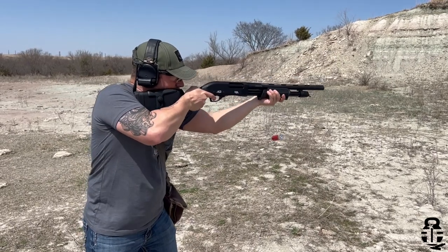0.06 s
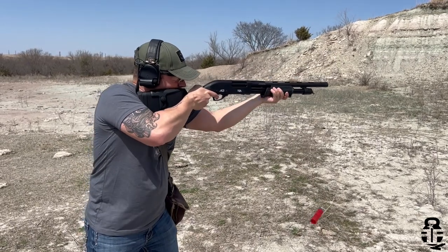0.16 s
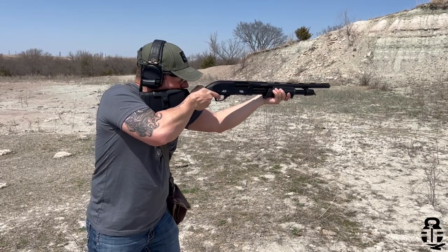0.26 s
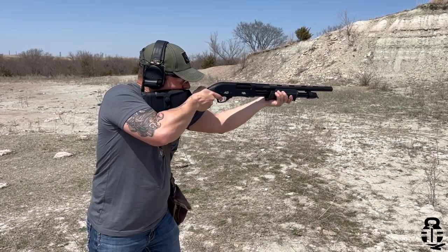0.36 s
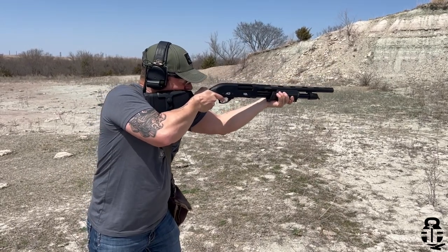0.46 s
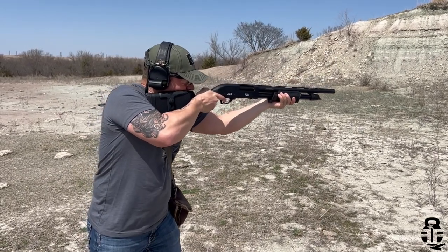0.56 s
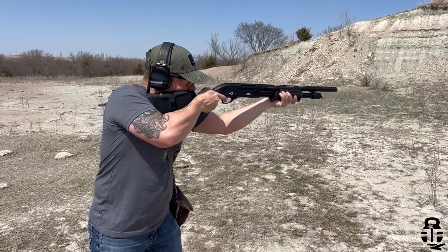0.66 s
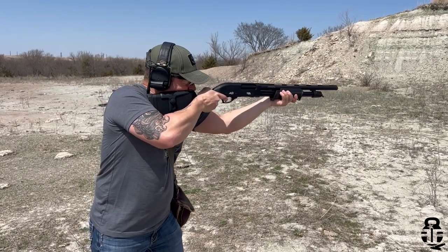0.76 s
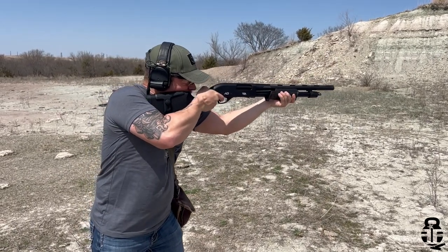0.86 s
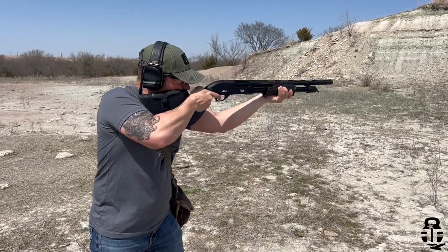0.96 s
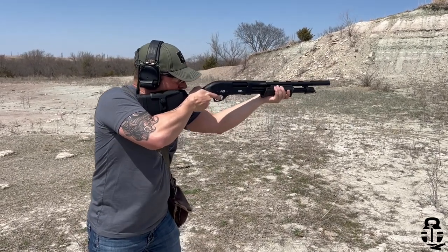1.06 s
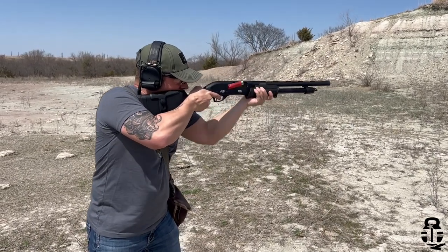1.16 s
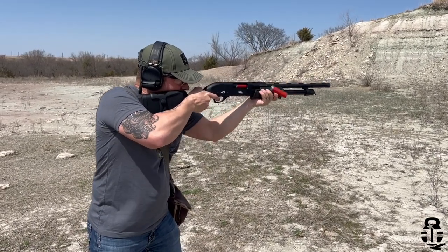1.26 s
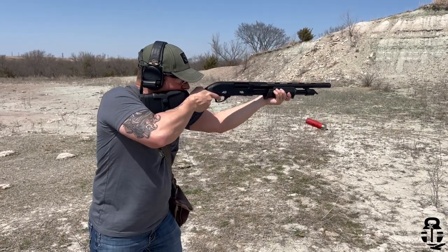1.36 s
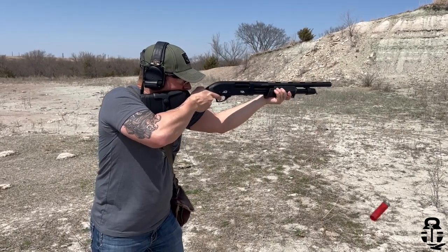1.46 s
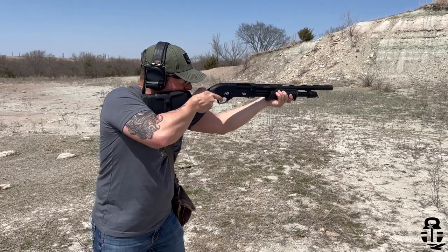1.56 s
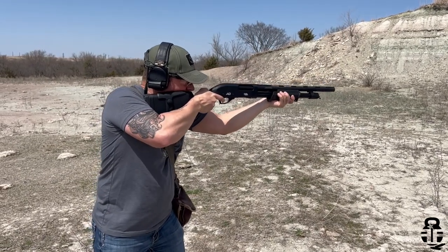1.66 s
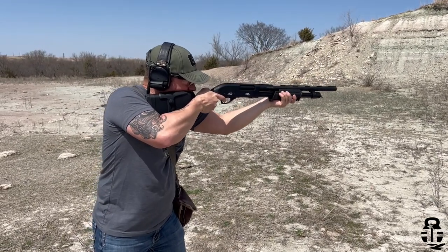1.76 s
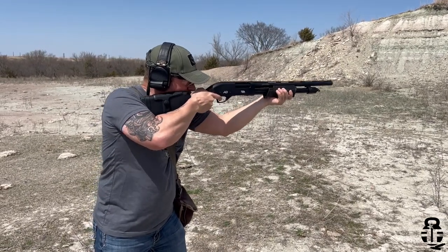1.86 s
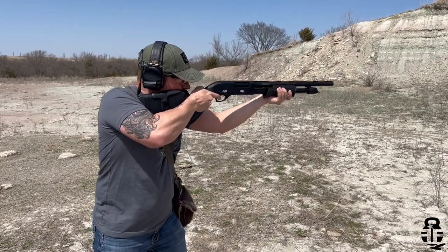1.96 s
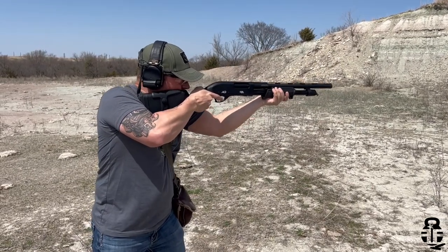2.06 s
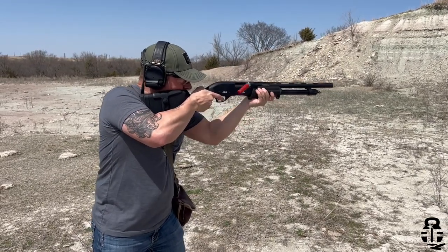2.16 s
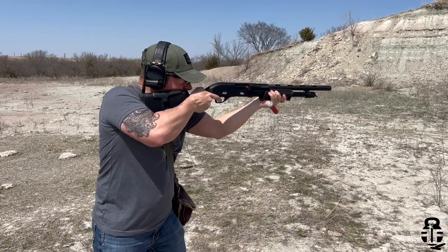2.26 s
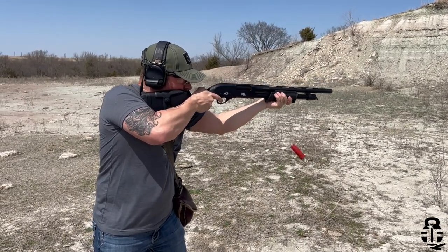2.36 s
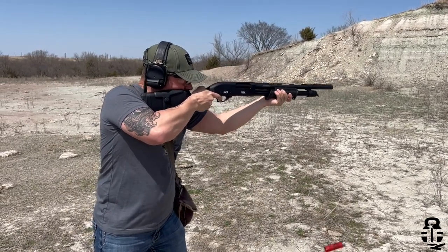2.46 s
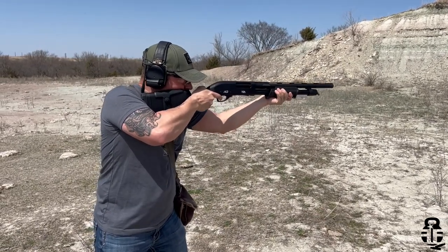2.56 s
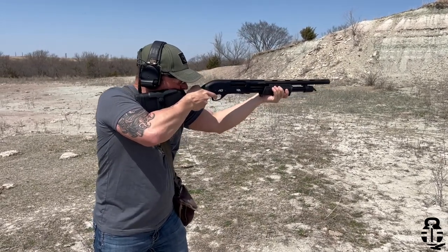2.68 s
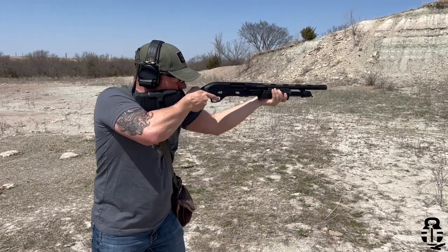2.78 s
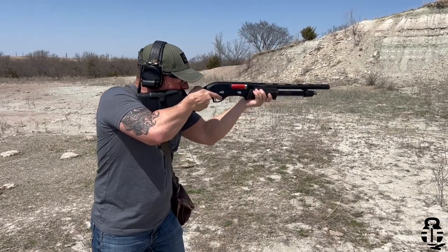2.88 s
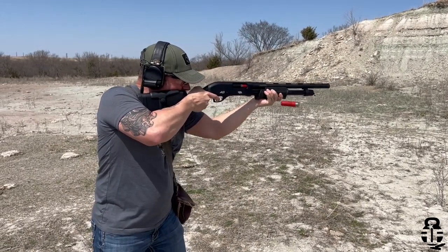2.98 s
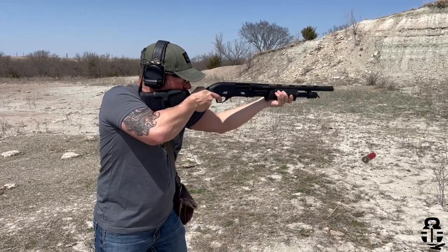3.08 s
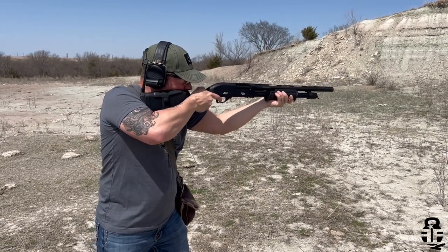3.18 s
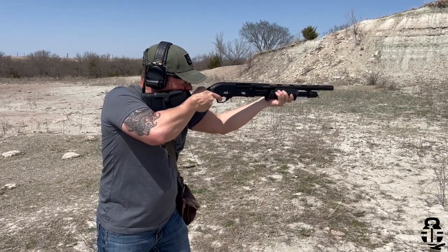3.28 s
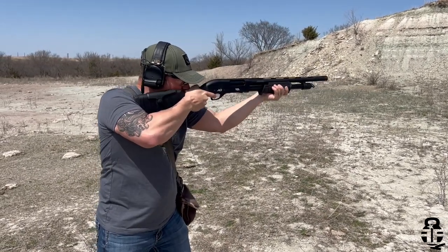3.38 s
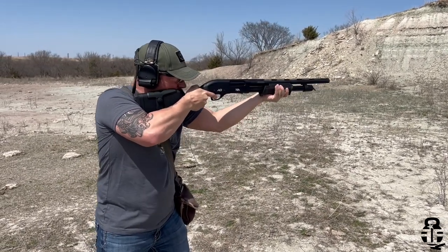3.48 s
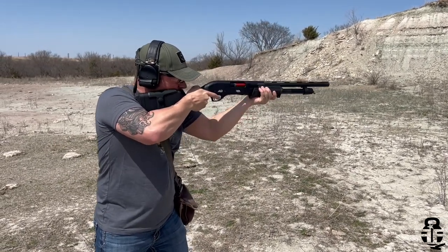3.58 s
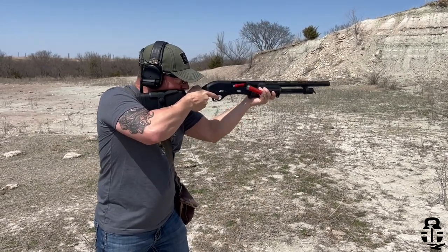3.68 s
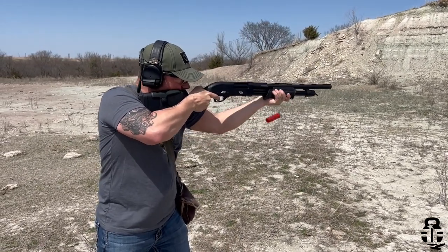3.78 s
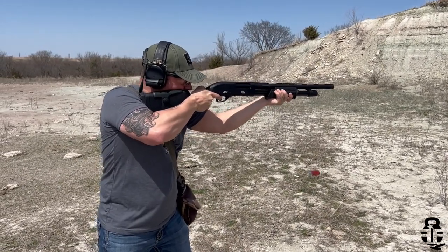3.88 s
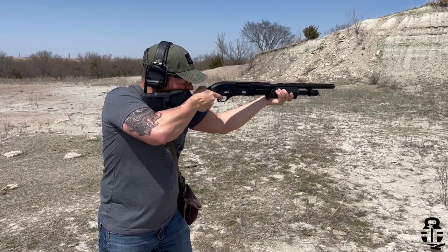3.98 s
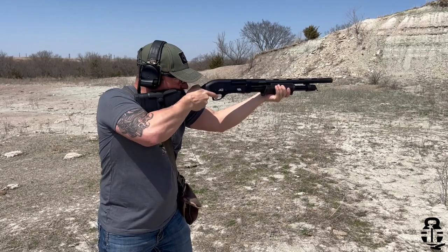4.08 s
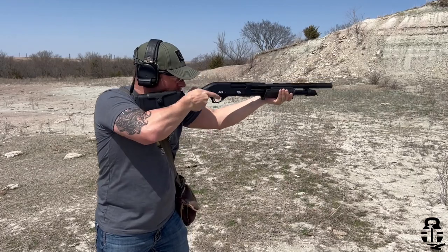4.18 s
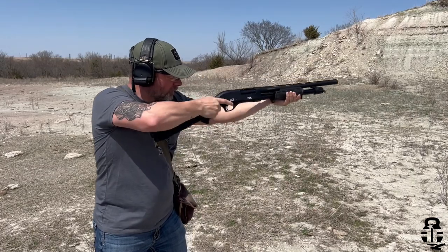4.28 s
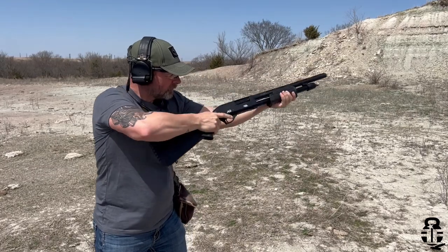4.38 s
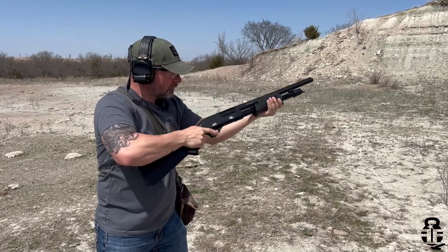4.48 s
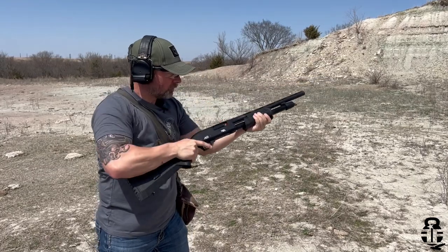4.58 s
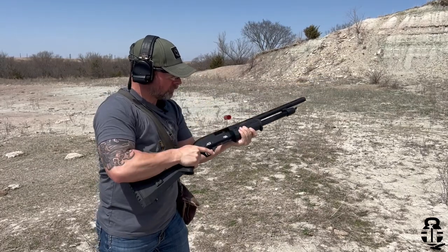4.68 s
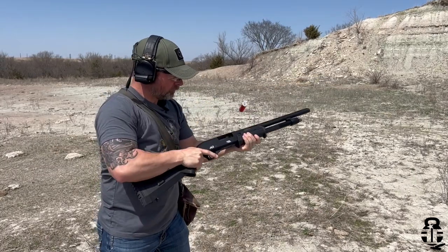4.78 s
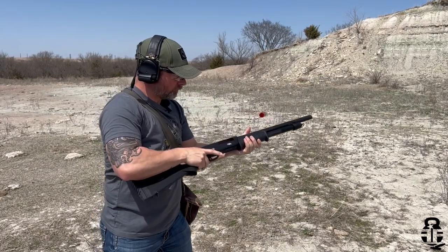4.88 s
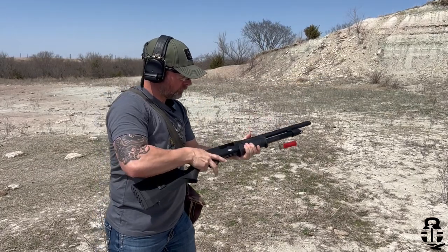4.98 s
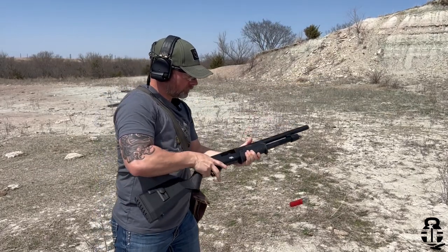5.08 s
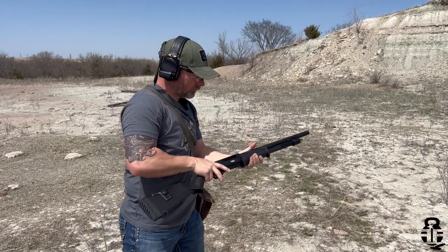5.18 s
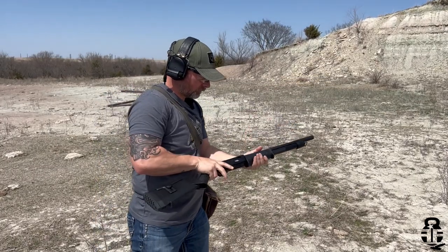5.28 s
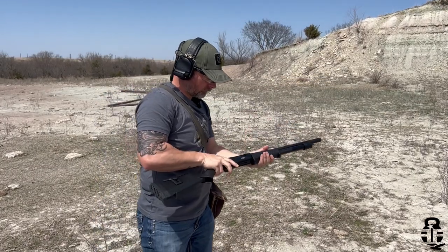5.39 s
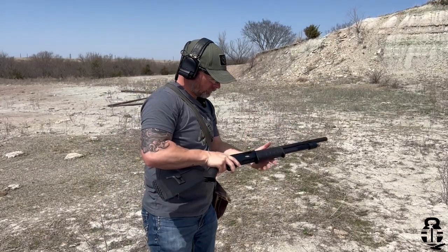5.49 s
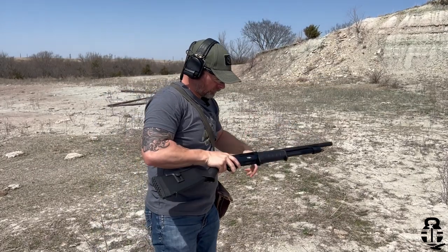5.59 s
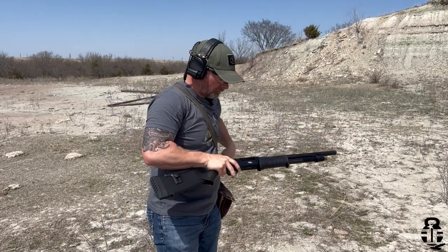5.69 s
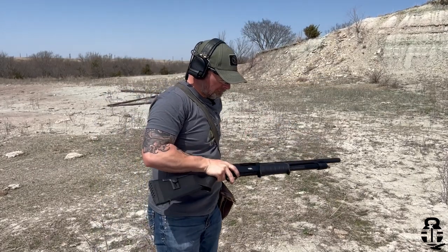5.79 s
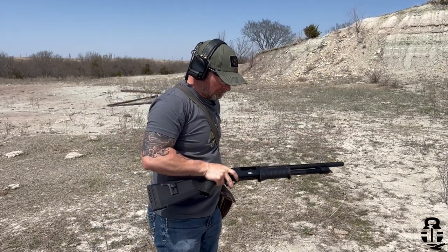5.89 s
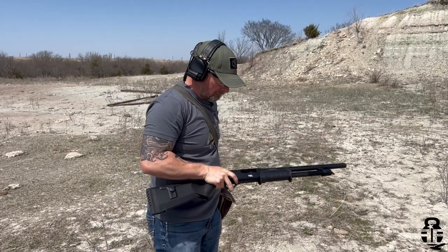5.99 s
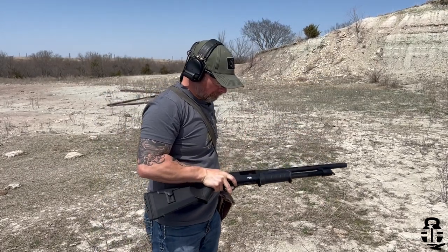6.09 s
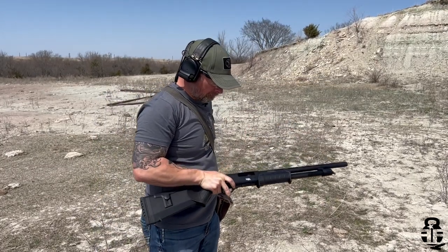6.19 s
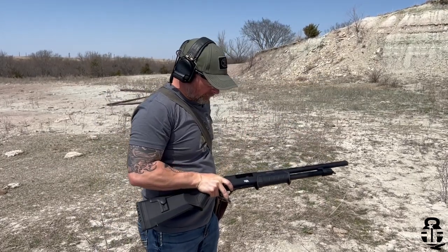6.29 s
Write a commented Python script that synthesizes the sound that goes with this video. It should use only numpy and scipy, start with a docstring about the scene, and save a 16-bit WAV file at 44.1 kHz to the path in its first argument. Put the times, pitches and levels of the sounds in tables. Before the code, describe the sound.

Close, loud metallic pump clacks alternate with five harsh, clipped shotgun blasts, under a second apart, in an open pit. Each bang gets a hard slap back from the banks and a quick fading tail. After the fifth, the pump is pulled back once more, an empty shell clicks out, and only faint air, cloth rub and gear knocks remain. The worn right microphone hears the action much stronger than the left one two metres off.

```python
"""A pump shotgun fires five times in an open pit; each blast is filtered noise returned by ground, banks and walls.
The pump is pushed home before each shot and pulled back after it: short rattles strike the modes of the gun.
Empty shells leave the gun or drop on stony ground and gear knocks, as struck modes with ticks; air, cloth and
wind are shaped noise. The shooter wears the right (near) microphone and the left (far) one stands two metres
off; both overload on every blast."""
import sys
import numpy as np
from scipy import signal
from scipy.fft import rfft, irfft
from scipy.io import wavfile
from scipy.ndimage import uniform_filter1d

SR = 44100
rng = np.random.default_rng(int(sys.argv[2]) if len(sys.argv) > 2 else 0)


def to_wav(sig):
    """Store sig (one row per channel, or 1-D mono) as 16-bit WAV at the path in sys.argv[1].

    Samples outside -1..1 are clipped; the rate is SR.
    """
    pcm = np.clip(np.atleast_2d(sig), -1, 1) * 32767
    pcm = np.round(pcm).astype(np.int16)
    wavfile.write(sys.argv[1], SR, pcm.T)  # frames by channels


N = 279594

# Spectrum of the open air. Each row: frequency in Hz, relative level in dB.
AIR_SPECTRUM = [(20, -1), (60, -2), (130, 1), (250, -8), (700, -11.5), (1500, -20), (4000, -31),
                (9000, -37), (16000, -48)]
AIR_FAR_DB, AIR_NEAR_DB = -68.5, -66

# Cloth rubbing and wind buffeting the worn microphone.
# Each row: time in seconds, rub level in dB, buffet level in dB.
RUB_AND_BUFFET = [(0, -62, -70.5), (0.804, -81.5, -72), (1.4, -75.5, -69), (2.499, -66, -57),
                  (3.25, -68.5, -68), (3.902, -63.5, -58.5), (4.402, -69.5, -63.5), (4.75, -67, -64),
                  (5.05, -70.5, -69), (5.12, -69.5, -61), (5.25, -71, -55), (5.4, -73.5, -58),
                  (5.5, -73.5, -71), (5.62, -61.5, -66.5), (5.802, -61.5, -66), (5.95, -59.5, -66),
                  (6.08, -66.5, -76), (6.34, -70.5, -73.5)]
# Smooth upper bands of the rubbing. Each row: centre in Hz, width in Hz, level in dB relative to the rub.
SWISH_BANDS = [(1990, 170, -14), (4180, 870, -18), (7000, 11000, -17)]

# Small knocks of sling and gear. Each row: time in seconds, thud level in dB, tick level in dB, thud pitch in Hz.
GEAR_KNOCKS = [(.1816, -49, -66, 920), (1.4876, -51, -63, 913), (2.4545, -56, -60, 916),
               (2.578, -43.5, -76, 877), (3.108, -48, -74, 1110), (3.16, -55, -61, 897),
               (3.3137, -51, -83, 900), (3.8355, -47, -65.5, 895), (3.9542, -44, -62.5, 893),
               (4.352, -69, -63, 1400), (4.393, -62, -66, 1400), (4.46, -62, -63.5, 1400),
               (4.506, -61, -60, 1400), (5.1145, -50, -78, 1614), (5.609, -49, -62, 1283),
               (5.8012, -40.5, -79, 323), (5.8546, -49, -73, 753), (5.8964, -56, -60, 894),
               (5.9195, -40, -76, 369), (5.9554, -45, -77, 386), (6.0217, -41.5, -81, 402),
               (6.0413, -42, -75, 783), (6.0689, -59.5, -57, 902)]
# Modes heard with the thud. Each row: frequency in Hz, level in dB relative to the thud, t60 in seconds.
GEAR_MODES = [(195, -9, 0.043), (740, -2.5, 0.02), (981, -10, .02)]
THUD_PERIODS = 3.74  # contact of a gear knock is held this many periods of its thud

# Empty shells: one leaves the gun at 4.665 s, the others bounce on stones; each strike rings the tube.
# Each row: time in seconds, tube level in dB, tick level in dB.
SHELL_STRIKES = [(0.499, -43.5, -51.5), (0.581, -71, -56.5), (0.623, -61.5, -66), (.745, -59, -64.5),
                 (0.767, -65.5, -74), (1.809, -44.5, -54), (4.665, -25, -30), (4.731, -61, -60),
                 (4.783, -62, -54.5), (5.391, -37.5, -67)]
# Modes heard with the tube. Each row: frequency in Hz, level in dB relative to the tube, t60 in seconds.
SHELL_MODES = [(457, -16, 0.039), (1270, -8, .06), (3770, -13.5, 0.013), (6400, -22, 0.017)]
TUBE_HZ = 1260

# The pump pulled back. Each row: stop in seconds; first click and unlock in seconds before it, rebound in
# seconds after it; then levels in dB of first click, unlock knock, unlock ticks, stop knock, stop clack,
# rebound knock, rebound clack and scrape.
PUMP_OPENINGS = [(1.1787, 0.038, 0.031, 0.033, -26.5, -9.5, -23.5, 3.5, -4.5, -4, -19.5, -31),
                 (2.157, 0.049, .0304, .0259, -36.5, -9, -19.5, 8.5, -5, -3, -10.5, -36),
                 (2.8923, 0.054, 0.027, .0229, -24, -8.5, -17.5, 3.5, -5.5, -5, -13.5, -38.5),
                 (3.6178, .0545, .0303, .0174, -20, -8.5, -21, 5.5, -3.5, -6.5, -8, -37),
                 (4.644, .059, .026, 0.0084, -20, -19.5, -21.5, -7, -2, -37, -12.5, -46)]
# The pump pushed home. Each row: lock in seconds; first click, shell fed and lifter in seconds before it; levels
# in dB of first click, feed knock, feed clack, lifter clack and lock knock; lock pitch in Hz; scrape level in dB.
PUMP_CLOSINGS = [(0.0841, 0.072, 0.044, .0145, -23.5, -12, -18.5, -16, 3.5, 875, -33),
                 (1.34, 0.075, .046, .0125, -25.5, -13.5, -15, -19.5, 4.5, 930, -36),
                 (2.3104, .075, 0.047, .009, -30.5, -19.5, -14.5, -16.5, 6.5, 930, -32),
                 (3.0364, 0.061, .0415, .0126, -24, -7, -18.5, -17, 5, 920, -30),
                 (3.75, .069, .047, .0164, -30.5, -6, -13, -23, 4.5, 903, -31.5)]
# Modes of the gun heard with the knock. Each row: frequency in Hz, level in dB relative to the knock,
# t60 in seconds.
GUN_MODES = [(140, -34, .04), (350, -23, .03), (680, -17, .05), (850, -20, .09), (1222, -13, .03),
             (2190, -27, .08), (3380, -21, .022), (4150, -23, .022), (5860, -32, .085), (7700, -20, .02)]
KNOCK_T60_S, CLACK_T60_S = .025, .02
KNOCK_HZ, STOP_HZ, REBOUND_HZ = 914, 922, 797
TICK_HELD_S, BLOW_HELD_S, STOP_HELD_S, LOCK_HELD_S = 0.0013, 0.0026, 0.0063, .008
UNLOCK_GAP_S = .008  # the unlock is three blows, the middle one a knock
TOUCH_LEAD_S, TOUCH_DB = 0.004, -18  # light touch just before the stop
SETTLE_AFTER_S, SETTLE_DB = .016, -15.5  # after the rebound, relative to its knock
FEED_ECHO_S, FEED_ECHO_DB = 0.0087, -6  # second, weaker tick of the shell being fed
LOCK_CLACK_DB = -10.5
TICK_KNOCK_DB = -5  # knock of a light tick relative to its clack
SCRAPE_LEAD_S, OPEN_RUNOUT_S, CLOSE_RUNOUT_S = 0.011, 0.02, 0.018
LOOSE_DB, LOOSE_SPREAD_DB = 5.5, 4.5  # ticks of loose parts, relative to the scrape
BODY_LOW_HZ = 241  # the knocks of the gun carry no bass below this
ACTION_FAR_S, CLACK_FAR_DB, KNOCK_FAR_DB = 0.0043, -22.5, -27.5
PIT_DB, PIT_T60_S = -81, 0.17  # faint airy echo of the racking

# The five shots. Each row: time in seconds, level in dB.
SHOTS = [(0.8905, -5.5), (1.872, -6.5), (2.6292, -6), (3.3551, -6), (4.004, -6)]
# What each shot sends to the microphones: hammer, blast, then banks and walls, last the far side of the pit.
# Each row: delay, rise, hold and t60 in seconds, centre in Hz, width in Hz, near level in dB, far level in dB,
# both relative to the shot.
RETURNS = [(-.005, .005, .005, .0056, 1300, 1971, -22.5, -30),
           (.001, 0.00051, .014, .12, 2890, 5737, -1, -2.5), (.001, .0012, .03, .13, 900, 800, -0.5, -2.5),
           (.006, .0056, .034, .074, 398, 50, -7.5, -3), (.005, .006, .057, 0.1, 234, 42, -22.5, -24),
           (.001, 0.0047, .054, .25, 152, 170, -15, -20), (.042, .004, .018, .1, 671.5, 819.5, -10, -15),
           (0.051, .004, .009, .031, 385.8, 199.1, -21, -15), (.081, .002, .011, .045, 900, 502, -1, -7.5),
           (0.083, .014, .0105, .015, 3907, 6000, -2, -1),
           (0.084, .0032, .049, 0.18, 1400, 3700, -20.5, -18),
           (.123, .0029, .036, 0.087, 1000, 706, -13, -17), (0.12, .012, .03, .1, 3000, 3000, -19.5, -19.5),
           (.129, 0.0068, .036, .04, 450, 312, -12, -10.5), (.125, .004, 0.05, .15, 153, 149, -23.5, -22),
           (0.17, .004, .031, 0.17, 1100, 2570, -33.5, -38),
           (.2, 0.0068, .054, .45, 1323, 2732, -49.5, -52), (.42, 0.031, .18, .9, 898, 865.4, -60.5, -60.5),
           (.53, 0.0088, 0.15, .35, 2114, 724.5, -64.5, -64.5)]
FRESH_SHARE = 0.46  # share of the noise power that differs from shot to shot
PATCHY_DB = 3  # depth of the lumps in the scatter
BLAST_FAR_S = .0072  # the direct blast reaches the far microphone later; echoes reach both together
DIRECT_S = .02  # arrivals before this come straight from the gun
BARREL_HZ, BARREL_T60_S, BARREL_NEAR_DB, BARREL_FAR_DB = 690.5, 1.43, -38, -41.5  # relative to the shot

CEILING = 0.47  # amplitude at which an input flattens
MIC_LOW_HZ, TOP_HZ = 70, 15800
PRESENCE_HZ, PRESENCE_MIX_DB = 2800, -10


def undb(db):
    """Amplitude ratio: twenty decibels make a factor of ten."""
    return 10 ** (np.asarray(db) / 20)


def unit(x):
    """Normalisation to an rms of 1 in each channel."""
    return x / np.sqrt(np.mean(x ** 2, axis=-1, keepdims=True))


def band(x, hz, width_hz):
    """Band-pass filtering with edges evenly spaced in pitch about the centre (upper edge limited), rms 1."""
    middle = np.sqrt(hz ** 2 + width_hz ** 2 / 4)
    edges = [middle - width_hz / 2, min(middle + width_hz / 2, .45 * SR)]
    return unit(signal.sosfilt(signal.butter(2, edges, "bandpass", fs=SR, output="sos"), x))


def add(out, sound, s):
    """Superposition: mix a sound in from time s."""
    i = max(int(s * SR), 0)
    n = min(sound.shape[-1], N - i)
    out[..., i:i + n] += sound[..., :n]


def envelope(t, held, t60, rise=0.003):
    """Energy supplied, then dissipated: linear rise, a level stretch until held, exponential decay."""
    return np.clip(t / rise, 0, 1) * undb(-60 * np.clip(t - held, 0, None) / t60)


def walk(rate):
    """Slow random modulation: Gaussian levels drawn rate times a second, slewed from each to the next."""
    k = int(SR / rate)
    held = np.repeat(rng.standard_normal(N // k + 1), k)
    return uniform_filter1d(held, k)[:N]


def ring(modes, t, chance):
    """Modal superposition: decaying sines whose levels and tuning vary a little from blow to blow."""
    hz, db, t60 = np.array(modes).T[:, :, None]
    level_chance, tuning_chance = chance.reshape(2, -1, 1)
    decay = undb(db + 2.5 * level_chance - 60 * t / t60)
    return np.sum(decay * np.sin(2 * np.pi * hz * (1 + .012 * tuning_chance) * t), axis=0)


def blows(events, modes, knock_t60, tick_t60, tick_hz, tick_width):
    """Impact excitation: a short rattle drives the body's modes and is heard as a tick; returns both layers."""
    body, tick, t = np.zeros(N), np.zeros(N), np.arange(int(.15 * SR)) / SR
    for s, body_db, tick_db, held, knock_hz in events:
        all_modes = [(knock_hz, 0, knock_t60)] + list(modes)
        rung = ring(all_modes, t, rng.standard_normal(2 * len(all_modes)))
        contact = envelope(t, held, 0.013, 0.00034) * rng.standard_normal(len(t)) ** 3  # bouncing contacts
        contact[0] = 40  # a hard first touch
        struck = signal.fftconvolve(contact, rung)[:len(t)]
        add(body, undb(body_db) * struck / np.abs(struck).max(), s)
        # loose parts give every tick its own pair of bright spots in a broad, spiky rattle
        spikes = rng.standard_normal(len(t)) ** 3
        spots = tick_hz * 2 ** (.6 * np.clip(rng.standard_normal(2), -2, 2))
        bright = sum(band(spikes, hz, hz / 7) for hz in spots)
        rattle = band(spikes, tick_hz, tick_width) + undb(-6) * bright
        add(tick, undb(tick_db) * envelope(t, held, tick_t60, .0015) * rattle, s)
    return body, tick


def open_air():
    """Broadband ambience: noise independent at each microphone, shaped by the air's spectrum."""
    hz, db = np.array(AIR_SPECTRUM).T
    f = np.fft.rfftfreq(N, 1 / SR) + 1  # offset keeps the logarithm finite
    gain = undb(np.interp(np.log(f), np.log(hz), db))
    air = unit(irfft(rfft(rng.standard_normal((2, N))) * gain, N))
    return air * undb(np.array([[AIR_FAR_DB], [AIR_NEAR_DB]]) + 0.4 * walk(1))


def cloth_and_wind():
    """Friction and turbulence: lumpy mid-band noise of cloth and low noise of wind, weaker at the far side."""
    s, rub_db, buffet_db = np.transpose(RUB_AND_BUFFET)
    t = np.arange(N) / SR
    folds = undb(5 * walk(35)) * band(rng.standard_normal(N), 600, 800)  # folds of cloth slip past
    swish = sum(undb(db) * band(rng.standard_normal(N), hz, width) for hz, width, db in SWISH_BANDS)
    rub = undb(np.interp(t, s, rub_db)) * (folds + swish)
    gusts = undb(np.interp(t, s, buffet_db) + 1.6 * walk(9.1))
    buffet = gusts * band(rng.standard_normal(N), 54, 82)
    return rub * undb([[-14], [0]]) + buffet * undb([[-12], [0]])


def gear_knocks():
    """Near-field impacts: thuds and clicks of gear close to the worn microphone, much weaker at the far one."""
    events = [(s, thud_db, tick_db, THUD_PERIODS / hz, hz) for s, thud_db, tick_db, hz in GEAR_KNOCKS]
    thud, click = blows(events, GEAR_MODES, 0.031, 0.018, 4540, 1200)
    return (thud + click) * undb([[-14], [0]])


def shell_strikes():
    """Impact on a light tube: each strike rings the empty shell, strong at both microphones."""
    events = [(*row, .002, TUBE_HZ) for row in SHELL_STRIKES]
    tube, tick = blows(events, SHELL_MODES, 0.017, 0.017, 3130, 5400)
    return (tube + tick) * undb([[-3], [0]])


def light_tick(s, db):
    """Brief contact: a clack with a weaker knock, as a row of the racking's blows."""
    return s, db + TICK_KNOCK_DB, db, TICK_HELD_S, KNOCK_HZ


def racking():
    """Sequence of contacts: blows (s, knock dB, clack dB, held s, knock Hz) and strokes (start s, end s, dB)."""
    hits, strokes = [], []
    for (stop, first, unlock, back, click_db, unlock_knock, unlock_tick, stop_knock, stop_clack,
         rebound_knock, rebound_clack, scrape) in PUMP_OPENINGS:
        unlocked, rebound = stop - unlock, stop + back
        hits += [light_tick(stop - first, click_db),
                 (unlocked, unlock_knock, unlock_tick, BLOW_HELD_S, KNOCK_HZ),
                 light_tick(unlocked - UNLOCK_GAP_S, unlock_tick),
                 light_tick(unlocked + UNLOCK_GAP_S, unlock_tick),
                 light_tick(stop - TOUCH_LEAD_S, TOUCH_DB),
                 (stop, stop_knock, stop_clack, STOP_HELD_S, STOP_HZ),
                 (rebound, rebound_knock, rebound_clack, BLOW_HELD_S, REBOUND_HZ),
                 light_tick(rebound + SETTLE_AFTER_S, rebound_knock + SETTLE_DB)]  # the slide settles
        strokes.append((stop - first - SCRAPE_LEAD_S, rebound + OPEN_RUNOUT_S, scrape))
    for (lock, first, feed, lift, click_db, feed_knock, feed_clack, lifter_clack, lock_knock,
         lock_hz, scrape) in PUMP_CLOSINGS:
        fed = lock - feed
        hits += [light_tick(lock - first, click_db),
                 (fed, feed_knock, feed_clack, BLOW_HELD_S, KNOCK_HZ),
                 light_tick(fed + FEED_ECHO_S, feed_clack + FEED_ECHO_DB),
                 light_tick(lock - lift, lifter_clack),
                 (lock, lock_knock, LOCK_CLACK_DB, LOCK_HELD_S, lock_hz)]
        strokes.append((lock - first - SCRAPE_LEAD_S, lock + CLOSE_RUNOUT_S, scrape))
    # eight loose ticks at random during each stroke
    for start, end, scrape in strokes:
        for place, size in rng.random((8, 2)):
            s = start + SCRAPE_LEAD_S + place * (end - start - SCRAPE_LEAD_S)
            hits.append(light_tick(s, scrape + LOOSE_DB + LOOSE_SPREAD_DB * (2 * size - 1)))
    return hits, strokes


def action():
    """Impact and stick-slip: blows over a gritty scrape; the far side hears mostly clack, late and smeared."""
    hits, strokes = racking()
    body, clack = blows(hits, GUN_MODES, KNOCK_T60_S, CLACK_T60_S, 3217, 5700)
    t, travel = np.arange(N) / SR, np.zeros(N)
    for start, end, db in strokes:
        travel += undb(db) * envelope(t - start, end - start, 0.071, 0.01)
    grit = undb(3 * walk(250)) * travel  # the bars catch and slip
    clack = clack + grit * band(rng.standard_normal(N), 2800, 5300)
    body = body + undb(3.5) * grit * band(rng.standard_normal(N), 680, 400)
    body = signal.sosfilt(signal.butter(2, BODY_LOW_HZ, "highpass", fs=SR, output="sos"), body)
    near = body + clack
    # away from the stock the knock thins out and the open side of the action sounds through
    side = signal.sosfilt(signal.butter(2, [1150, 2400], "bandpass", fs=SR, output="sos"), near)
    far = undb(CLACK_FAR_DB) * (clack + undb(-2.0) * side) + undb(KNOCK_FAR_DB) * body
    lag = np.arange(int(.06 * SR)) / SR
    ground = rng.standard_normal(len(lag)) * undb(-25 - 60 * lag / .07)  # scatter off the stones
    ground[0] = 1  # direct sound
    out = np.array([np.zeros(N), near])
    add(out[0], signal.fftconvolve(far, ground)[:N], ACTION_FAR_S)
    lag = np.arange(int(.4 * SR)) / SR
    pit = rng.standard_normal((2, len(lag))) * undb(PIT_DB) * envelope(lag, 0.061, PIT_T60_S, .04)
    return out + signal.fftconvolve(clack[None], pit, axes=1)[:, :N]


def shots():
    """Scattering by fixed terrain: each shot is returned as band noise that partly repeats, over a barrel ring."""
    out, t = np.zeros((2, N)), np.arange(SR) / SR
    terrain = rng.standard_normal((len(RETURNS), 2, SR))
    lumps = [undb(PATCHY_DB * walk(150)[:SR]) for _ in RETURNS]  # the ground scatters in lumps
    barrel_db = np.array([[BARREL_FAR_DB], [BARREL_NEAR_DB]])
    for s, db in SHOTS:
        for scatter, lump, row in zip(terrain, lumps, RETURNS):
            delay, rise, held, t60, hz, width, near_db, far_db = row
            n = min(int((held + t60) * SR) + 500, SR)
            fresh = rng.standard_normal((2, n))
            noise = np.sqrt(1 - FRESH_SHARE) * scatter[:, :n] + np.sqrt(FRESH_SHARE) * fresh
            far, near = band(noise, hz, width) * lump[:n] * envelope(t[:n], held, t60, rise)
            far_lag = BLAST_FAR_S if delay < DIRECT_S else 0
            add(out[0], undb(db + far_db) * far, s + delay + far_lag)
            add(out[1], undb(db + near_db) * near, s + delay)
        decay = undb(db + barrel_db - 60 * t / BARREL_T60_S)
        add(out, decay * np.sin(2 * np.pi * BARREL_HZ * t), s)
    return out


def scene():
    """Linear superposition of all sources at the far (left) and near (right) microphones."""
    return open_air() + cloth_and_wind() + gear_knocks() + shell_strikes() + action() + shots()


def record(dry):
    """Saturation at the inputs' ceiling, then filtering: bass cut, presence range lifted, top cut."""
    x = dry / CEILING
    flat = CEILING * x / (1 + x ** 6) ** (1 / 6)
    flat = signal.sosfilt(signal.butter(1, MIC_LOW_HZ, "highpass", fs=SR, output="sos"), flat)
    presence = signal.lfilter(*signal.iirpeak(PRESENCE_HZ, 1, fs=SR), flat)
    flat = flat + undb(PRESENCE_MIX_DB) * presence
    return signal.sosfilt(signal.ellip(8, .2, 70, TOP_HZ, fs=SR, output="sos"), flat)


dry = scene()
out = record(dry)
to_wav(out)
```